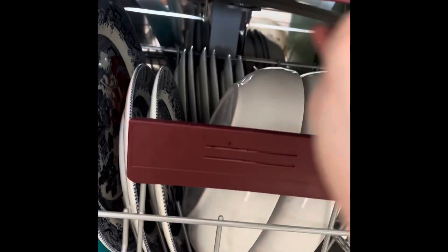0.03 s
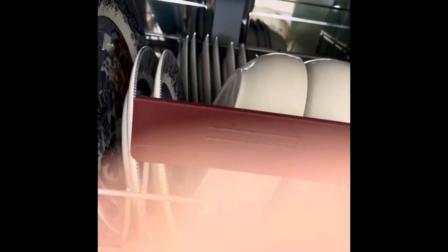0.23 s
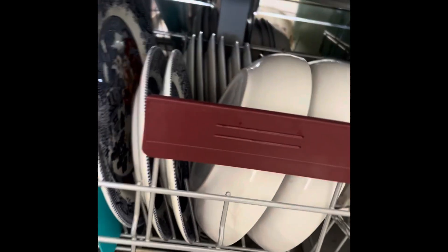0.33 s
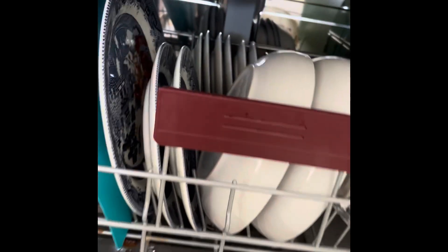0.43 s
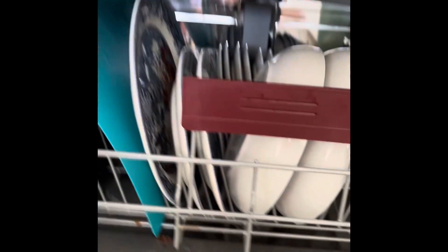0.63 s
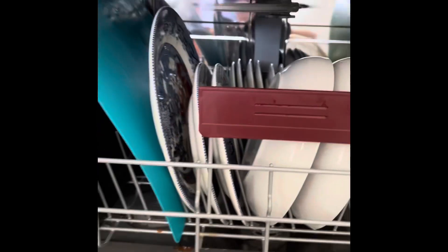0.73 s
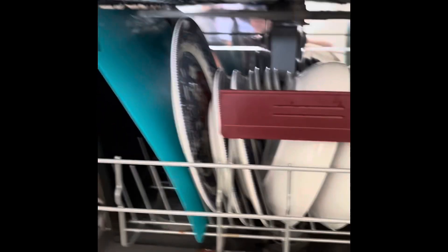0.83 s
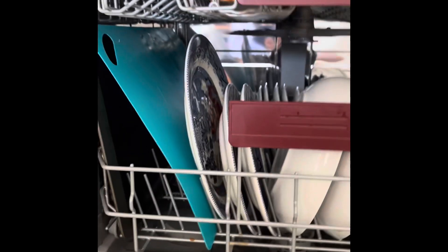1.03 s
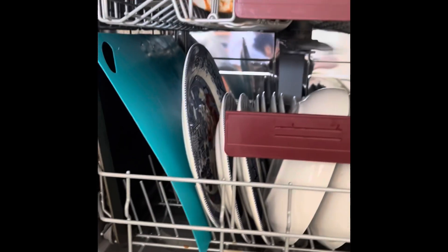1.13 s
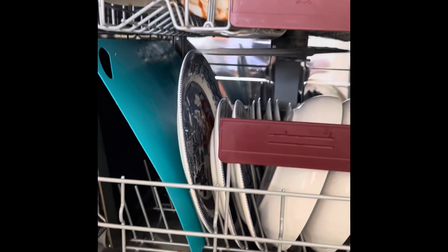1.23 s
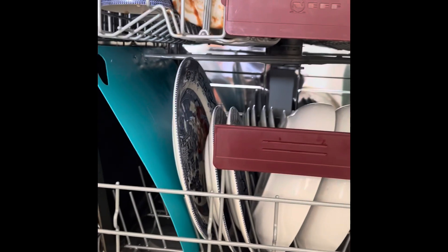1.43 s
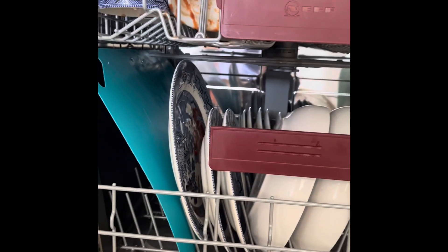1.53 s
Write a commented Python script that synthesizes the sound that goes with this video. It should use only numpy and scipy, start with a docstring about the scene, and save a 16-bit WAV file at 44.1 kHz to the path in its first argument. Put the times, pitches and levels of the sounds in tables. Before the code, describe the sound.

Dishes clatter in a dishwasher rack as it is moved, close to the microphone in a quiet kitchen. A loud clack and low thump come first, then three more short, ringing clacks over softly rumbling wheels.

```python
"""Moving a loaded dishwasher rack

In a quiet kitchen the rack rumbles on its wheels and slides softly on its runners.
Plates and bowls clack against each other and ring, and so does the wire rack.
The steel tub gives every knock a dense clatter and thumps low when the rack bounces.
It is all heard close by, through a pair of small microphones."""
import sys
import numpy as np
from scipy import signal
from scipy.fft import rfft, irfft, next_fast_len
from scipy.io import wavfile

SR = 44100
rng = np.random.default_rng(int(sys.argv[2]) if len(sys.argv) > 2 else 0)


def to_wav(sig):
    """Store sig (one row per channel, or 1-D mono) as 16-bit WAV at the path in sys.argv[1].

    Samples outside -1..1 are clipped; the rate is SR.
    """
    pcm = np.clip(np.atleast_2d(sig), -1, 1) * 32767
    pcm = np.round(pcm).astype(np.int16)
    wavfile.write(sys.argv[1], SR, pcm.T)  # frames by channels


N = 70560
TIME = np.arange(N) / SR


def from_db(db):
    """Turn decibels into a number to multiply by."""
    return 10 ** (np.asarray(db) / 20)


def at_hz(points, hz, column=1):
    """Look up a table at a frequency, gliding between rows on a scale of octaves."""
    rows = np.array(points)
    return np.interp(np.log(hz + 1e-9), np.log(rows[:, 0]), rows[:, column])


def in_time(points):
    """Look up a level curve at every sample."""
    return np.interp(TIME, *np.transpose(points))


def decay(age, t60):
    """Fade away; t60 is the time it takes to fall by 60 dB."""
    return np.exp(-np.log(1000) * age / t60)


def since(start):
    """Seconds since an event, zero before it."""
    return np.maximum(TIME - start, 0)


def flicker(spread_db, rate_hz):
    """A gain that wanders to a new random level rate_hz times a second."""
    steps = rng.standard_normal(256)
    return from_db(spread_db * np.interp(TIME * rate_hz, np.arange(len(steps)), steps))


def noise_bands(spectrum):
    """Two unrelated noises in quarter-octave bands, as (Hz, band); the powers add up to 1."""
    edges = 22 * 2 ** (np.arange(39) / 4)
    centres = np.sqrt(edges[1:] * edges[:-1])
    gains = from_db(at_hz(spectrum, centres)) * np.sqrt(np.diff(edges))
    gains /= np.linalg.norm(gains)
    white = rng.standard_normal((2, 2, N + SR // 4))
    for k, hz in enumerate(centres):
        band_pass = signal.butter(2, edges[k:k + 2], "band", fs=SR, output="sos")
        band = signal.sosfilt(band_pass, white[k % 2])[:, -N:]
        yield hz, gains[k] * band / band.std()


def sing(tones):
    """Fine friction keeps an object's own tones ringing; the result has power 1."""
    out = np.zeros((2, N))
    for hz, db, t60 in tones:
        friction = rng.standard_normal((2, N + SR // 4))
        fade = decay(1 / SR, t60)
        feedback = [1, -2 * fade * np.cos(2 * np.pi * hz / SR), fade * fade]
        tone = signal.lfilter([1, 0, -1], feedback, friction)[:, -N:]
        out += from_db(db) * tone / tone.std()
    return out / out.std()


# the broad tones of a rubbing plate: f/Hz, level/dB, t60/s
RUB_TONES = [(272, 5, 0.041), (760, -8, .012), (1110, -4, 0.028), (2200, -19, 0.0054)]

def plate_rub():
    """A plate rubs along the wires in one short stroke before it knocks."""
    progress = np.minimum(since(1.232) / .088, 1)  # 0 to 1 over the stroke
    stroke = np.sqrt(np.abs(np.sin(np.pi * progress)))
    return from_db(-63) * stroke * sing(RUB_TONES)


# how strong the hiss is from low to high: f/Hz, level/dB
HISS_SPECTRUM = [(300, 2), (900, 0), (1250, -4), (1600, -7.5), (2000, -11.5), (2400, 6), (3300, -14.5),
                 (4300, -4), (4800, -7), (5400, 0.5), (6300, -17.5), (9000, -30), (16000, -34.5)]
# how the hiss comes and goes: t/s, level/dB
HISS_LEVEL = [(0, -71), (.14, -112), (.19, -66), (.235, -53.5), (.4, -64.5), (.6, -61), (.73, -55),
              (.81, -55), (.92, -57), (1.1, -86.5), (1.17, -75), (1.28, -95), (1.315, -56), (1.45, -63.5),
              (1.53, -66.5), (1.6, -63.5)]
# the runners' own tones: f/Hz, level/dB, t60/s
RUNNER_TONES = [(1580, 0, .016), (2400, -4, .012), (4300, 0, .006), (4950, -5, .007)]

def runner_hiss():
    """The rack slides on its runners, which hiss and ring a little."""
    hiss = sum(band * flicker(spread_db=1.5, rate_hz=40) for _, band in noise_bands(HISS_SPECTRUM))
    ringing = from_db(-3) * sing(RUNNER_TONES)
    return (hiss + ringing) * from_db(in_time(HISS_LEVEL))


# how strong a nudge is from low to high: f/Hz, level/dB
NUDGE_SPECTRUM = [(70, -6.5), (130, 10), (200, -5), (330, 2), (550, -4), (900, 0), (1300, -20.5),
                  (2500, -30.5), (5000, -30.5), (12000, -31.5)]
# each nudge: t/s, level/dB, tilt towards the highs/(dB per octave)
LOAD_NUDGES = [(0.067, -54, -0.5), (0.148, -46.5, 0.2), (0.205, -49, 2.5), (1.138, -53, -3.5)]

def nudges():
    """The load shifts with soft, dull puffs of noise."""
    starts, db, tilt_db = np.transpose(LOAD_NUDGES)
    ages = np.array([since(start) for start in starts])
    puffs = (1 - np.exp(-ages / .005)) * decay(ages, t60=.16)
    out = np.zeros((2, N))
    for hz, band in noise_bands(NUDGE_SPECTRUM):
        gains = from_db(db + tilt_db * np.log2(hz / 350))
        out += band * (gains @ puffs)
    return out


# how strong the rumble is from low to high: f/Hz, level/dB
RUMBLE_SPECTRUM = [(20, -14.5), (40, -12), (70, 1), (110, 4.5), (180, -13.5), (270, -7.5), (320, -23.5),
                   (380, -11.5), (520, -17), (900, -21.5), (1400, -28.5), (3000, -34), (8000, -47.5),
                   (16000, -56)]
# how the rumble comes and goes: t/s, level/dB
WHEEL_LEVEL = [(0, -56), (.13, -59), (.17, -48.5), (.205, -57), (.245, -35.5), (.45, -39), (.62, -49),
               (.73, -51.5), (.8, -58), (.98, -46.5), (1.1, -58), (1.16, -58), (1.22, -63), (1.4, -49.5),
               (1.6, -66.5)]
# the wire rack's own tones, which knocks also set off: f/Hz, level/dB, t60/s
RACK_TONES = [(230, -6, .35), (270, -1, .5), (328, -2, .4), (382, -2, .6), (458, -5, .3), (504, -6, .22),
              (560, -5, .28)]

def wheel_rumble():
    """The rack rumbles on its wheels, and three of its tones ring a little."""
    rumble = sum(band * flicker(spread_db=6, rate_hz=31) for _, band in noise_bands(RUMBLE_SPECTRUM))
    ringing = from_db(-11.5) * sing(RACK_TONES[1:4])
    return (rumble + ringing) * from_db(in_time(WHEEL_LEVEL))


# each bounce of the heavy rack: t/s, level/dB, f/Hz
BOUNCES = [(0.259, -16.5, 104.4), (0.289, -19.5, 70.6), (0.35, -30, 90.3), (0.408, -35, 93),
           (.512, -32, 78.8), (0.561, -33.5, 87.5), (.828, -33.5, 79.7), (0.861, -34, 97.2),
           (0.936, -36, 94.7), (1.036, -47, 90.4), (1.347, -38, 79.3), (1.368, -29, 88.3)]

def thumps(rise_s=.015, t60=.14):
    """Soft bounces make the tub's panels boom for a few cycles."""
    out = np.zeros((2, N))
    for start, db, hz in BOUNCES:
        age = since(start)
        swell = np.sin(np.pi / 2 * np.minimum(age / rise_s, 1)) ** 2
        fade = decay(since(start + rise_s), t60)
        out[0] += from_db(db) * swell * fade * np.sin(2 * np.pi * hz * age)  # both microphones share it
    return out


def ring(tones, start, db, rise_s=.00077):
    """One blow sets off an object's own tones, each with a slightly random strength."""
    age, out = since(start), np.zeros((2, N))
    for hz, tone_db, t60 in tones:
        phase = rng.uniform(0, 2 * np.pi, (2, 1))
        gain = from_db(db + tone_db - rng.standard_normal())
        out += gain * decay(age, t60) * np.sin(2 * np.pi * hz * age + phase)
    return out * (1 - np.exp(-age / rise_s))


# a plate's and a bowl's own tones: f/Hz, level/dB, t60/s
PLATE_TONES = [(728, -7, .15), (1118, -5, .12), (1146, 0, .12), (1490, -12, .12), (1578, -11, .17),
               (1755, -13, .12), (2110, -9, .1), (2380, -8, .08), (2640, -11, .12), (3420, -13, .14),
               (3900, -15, .12), (4970, -16, .12), (7150, -13, .11), (8420, -16, .1)]
BOWL_TONES = [(755, -2, .2), (822, -5, .22), (882, -5, .34), (927, -2, .2), (1039, -2, .16),
              (1115, -4, .18), (1419, -4, .2), (1580, -5, .18), (2230, -6, .15), (2416, -4, .15),
              (2800, -3, .27), (2900, -5, .24), (3284, -3, .2), (3727, -7, .19), (4970, -11, .16),
              (6200, -10, .14)]
# each knock: t/s, clatter level/dB, six boosts/dB (one for each BOOST_HZ),
# multiplier of the tub's t60, plate level/dB, bowl level/dB, rack level/dB
KNOCKS = [(0.2419, -10.5, 1, 7, 2, 0.89, 0, 4.5, 0.79, -26.5, -35, -35.5),
          (0.2675, -18.5, -4, -1, -4.5, 0.53, -7, -0.5, 1.4, -30, -25, -37),
          (0.4847, -14.5, -2.5, 2.5, -3, 0.11, 1.5, -2, 0.91, -27.5, -35, -37),
          (0.8173, -18.5, 0.5, 4.5, -1.5, 0.59, 2, -2.5, 0.74, -26, -56, -40.5),
          (1.3202, -23.5, 2.5, 1, -2, 0.99, -1, -4.5, 0.78, -31, -40.5, -44.5),
          (1.3558, -30.5, 2.5, 9.5, -6, -0.71, 1, 0.5, 0.87, -42.5, -50.5, -57)]

def ringing_dishes():
    """Plate, bowl and wire rack ring after every knock."""
    out = np.zeros((2, N))
    for start, *_, plate_db, bowl_db, rack_db in KNOCKS:
        out += ring(PLATE_TONES, start, plate_db)
        out += ring(BOWL_TONES, start, bowl_db)
        out += ring(RACK_TONES, start, rack_db, rise_s=.0027)
    return out


# where a knock's clatter is turned up or down: f/Hz
BOOST_HZ = [350, 1000, 2250, 3800, 7500, 12000]
# how strong the clatter is from low to high: f/Hz, level/dB
CLATTER_SPECTRUM = [(120, -13.5), (190, -7), (260, -4), (420, -2.5), (620, -3), (850, 0.5), (1100, -4.5),
                    (1250, -6), (1600, -4), (2500, 2.5), (3300, -1.5), (4200, -6.5), (5200, -5),
                    (6100, -7.5), (7600, -7), (9500, -11), (12000, -13), (14000, -26.5), (16000, -32.5)]
# how it grows and fades: f/Hz, rise/s, tub t60/s, kitchen level/dB, kitchen t60/s
CLATTER_FADE = [(242, .012, 0.36, -18, 0.28), (700, 0.0067, 0.14, -10.5, 0.31),
                (1470, 0.00083, 0.17, -14, 0.39), (3500, 0.0036, 0.13, -18, 0.38),
                (8050, .0007, .085, -15, 0.29), (14000, 0.00037, .07, -21.5, .3)]

def clatter(crack_db=2, crack_t60=.025):
    """Each knock cracks, the load and tub ring in a blur of tones, lows last, and the kitchen echoes."""
    out = np.zeros((2, N))
    for hz, band in noise_bands(CLATTER_SPECTRUM):
        rise_s, tub_t60, room_db, room_t60 = (at_hz(CLATTER_FADE, hz, column) for column in (1, 2, 3, 4))
        crack = from_db(crack_db) * decay(TIME, crack_t60)
        room = from_db(room_db) * decay(TIME, room_t60)
        build_up = 1 - np.exp(-TIME / rise_s)
        power = np.zeros(N)
        for start, db, *boosts_db, stretch, _, _, _ in KNOCKS:
            first = int(start * SR)
            gain = from_db(db + np.interp(np.log(hz), np.log(BOOST_HZ), boosts_db))
            tub = decay(TIME, tub_t60 * stretch)
            knock_power = (gain * build_up) ** 2 * (crack ** 2 + tub ** 2 + room ** 2)
            power[first:] += knock_power[:N - first]
        out += band * np.sqrt(power)
    return out


def tub_echoes(sound, round_trip_s=.00265, returned=.25):
    """Sound bounces between the tub's steel walls and turns hollow, but no louder."""
    loop = np.zeros(round(round_trip_s * SR) + 1)
    loop[0], loop[-1] = 1, -returned
    return signal.lfilter([np.sqrt(1 - returned ** 2)], loop, sound)


# how alike the two microphones sound: f/Hz, likeness (0 to 1)
MIC_LIKENESS = [(100, .985), (350, .97), (650, .88), (1100, .89), (2000, .82), (2800, .68), (4200, .42),
                (5200, .65), (6000, .96), (9000, .92), (10300, .96), (12500, .88), (15000, .92)]
# how far the left wave is ahead of the right: f/Hz, phase/rad
LEFT_LEAD = [(20, 0), (150, -.03), (500, -.5), (900, -.3), (1550, -.25), (2100, .7), (2600, 2.6),
             (3200, 2.0), (4000, 1.6), (5000, 1.0), (5950, 3.1), (7800, 6.15), (8700, 6.9), (10100, 9.3),
             (11000, 9.9), (12100, 12.4), (13100, 12.8), (14300, 15.5), (16000, 16.0)]

def microphones(sound):
    """The first row reaches both microphones, the second sets them apart; left leads in the highs."""
    size = next_fast_len(N + SR // 10)
    shared, apart = rfft(sound, size)
    hz = np.arange(len(shared)) * SR / size
    alike = np.clip(at_hz(MIC_LIKENESS, hz), 0, 1)
    turn = np.exp(.5j * at_hz(LEFT_LEAD, hz))  # half the lead for each side
    mid = shared * np.sqrt((1 + alike) / 2)
    side = apart * np.sqrt((1 - alike) / 2)
    left, right = (mid + side) * turn, (mid - side) / turn
    return irfft(np.array([left, right]), size)[:, :N]


def scene():
    """The noises echo in the tub and reach the microphones along with the ringing and thumps."""
    noises = clatter() + wheel_rumble() + runner_hiss() + nudges() + plate_rub()
    return microphones(tub_echoes(noises) + ringing_dishes() + thumps())


def record(dry, low_cut_hz=35, high_cut_hz=16000):
    """The deepest bass is thinned and the very highest sounds are cut off steeply."""
    low_cut = signal.butter(3, low_cut_hz, "high", fs=SR, output="sos")
    high_cut = signal.ellip(10, .1, 80, high_cut_hz, fs=SR, output="sos")
    return signal.sosfilt(high_cut, signal.sosfilt(low_cut, dry))


dry = scene()
out = record(dry)
to_wav(out)
```